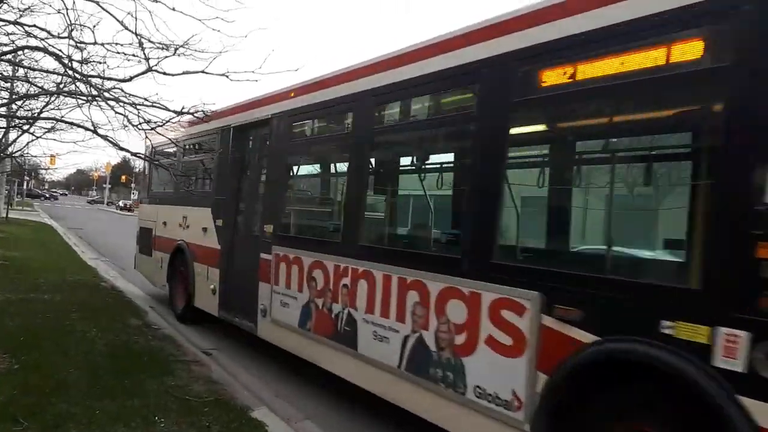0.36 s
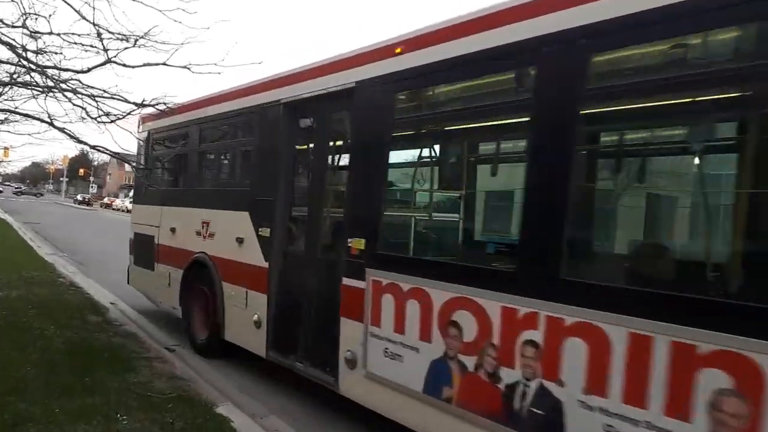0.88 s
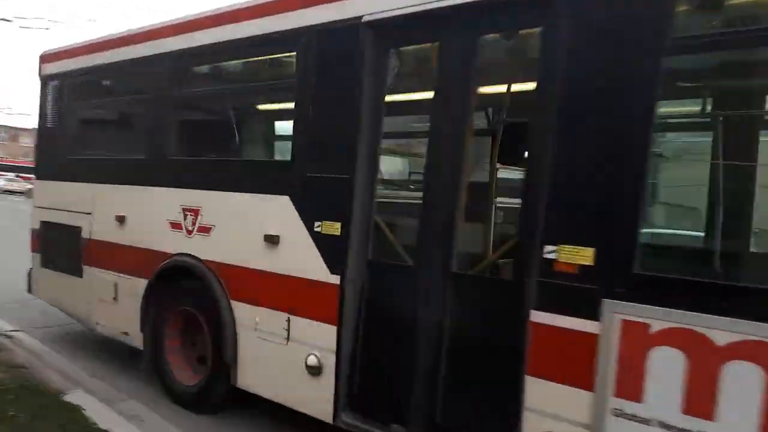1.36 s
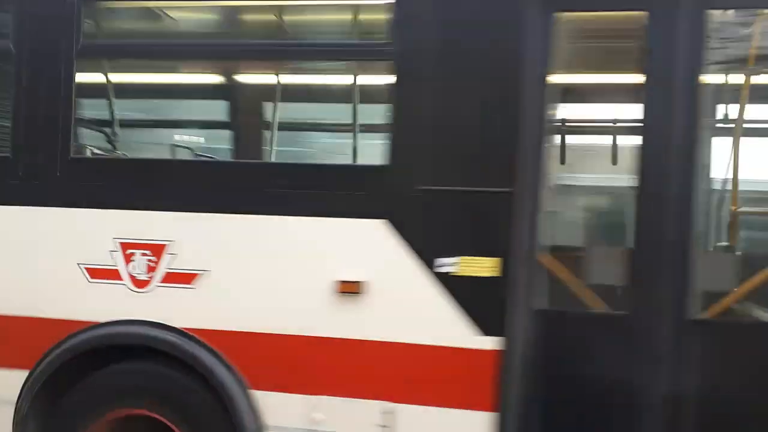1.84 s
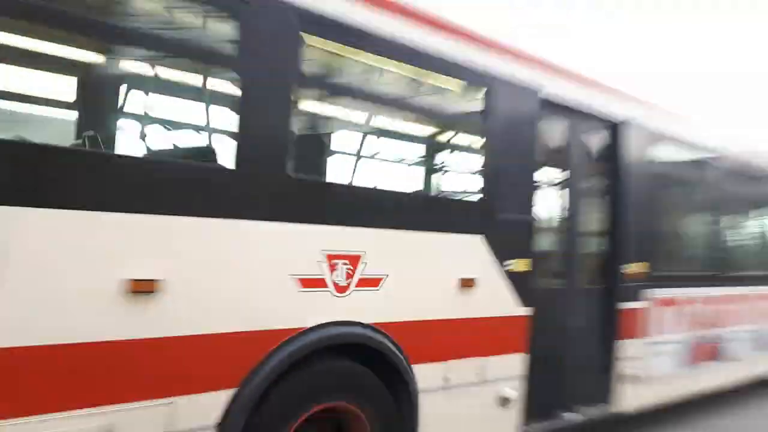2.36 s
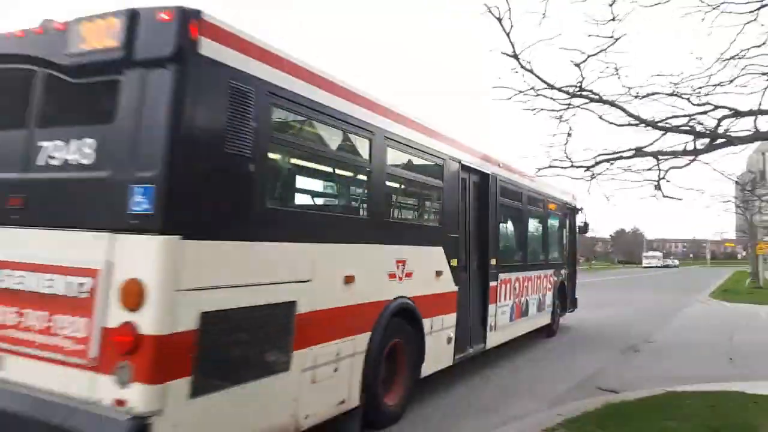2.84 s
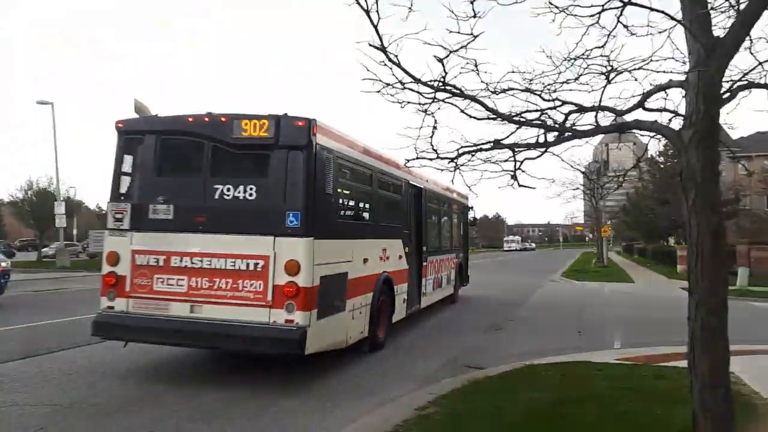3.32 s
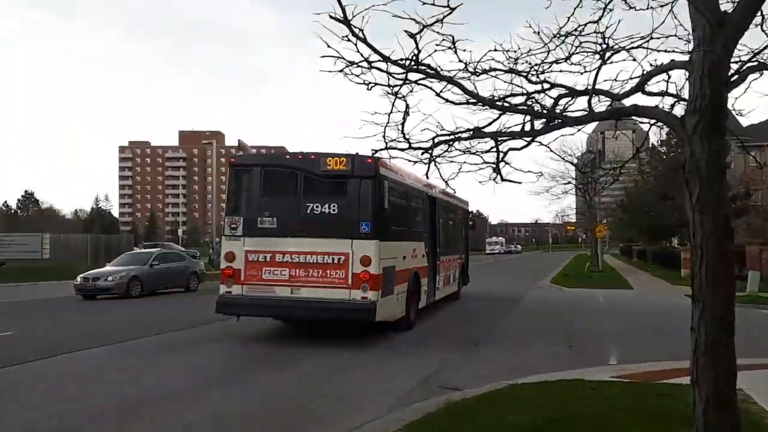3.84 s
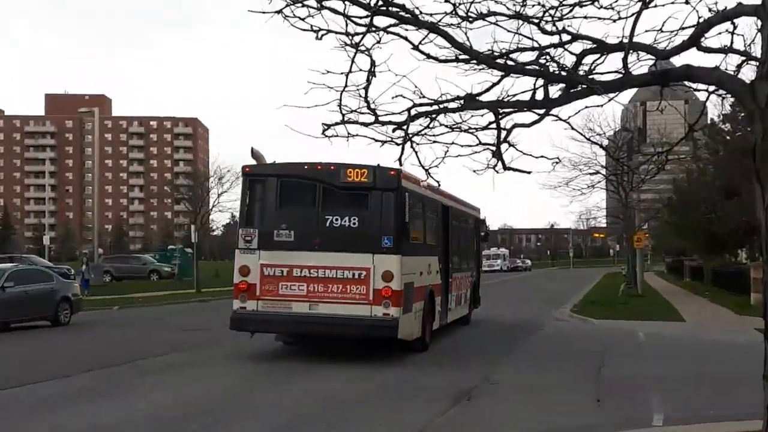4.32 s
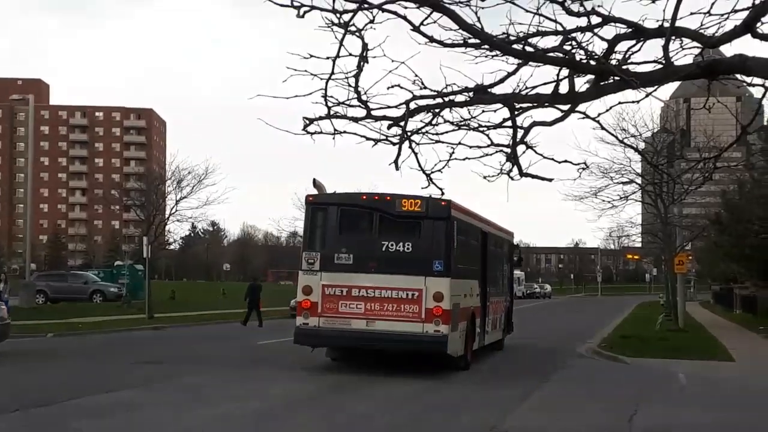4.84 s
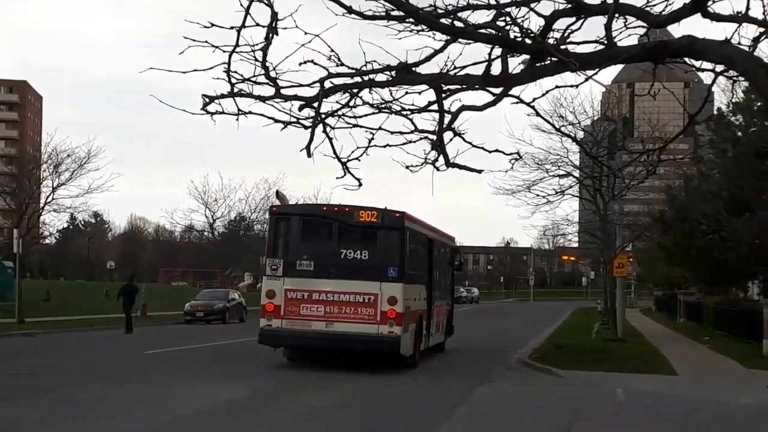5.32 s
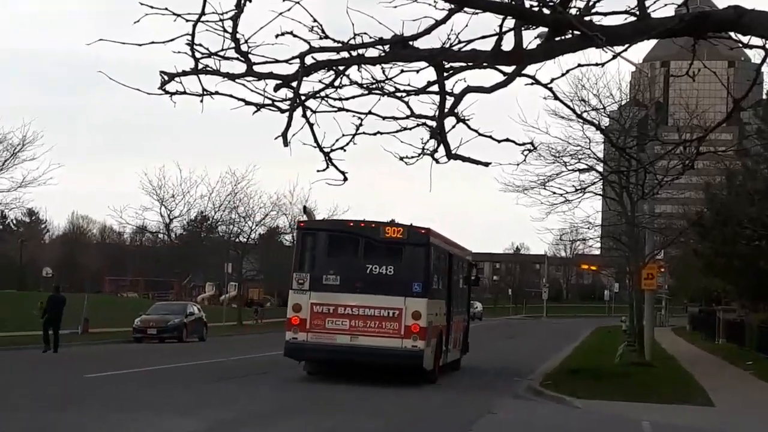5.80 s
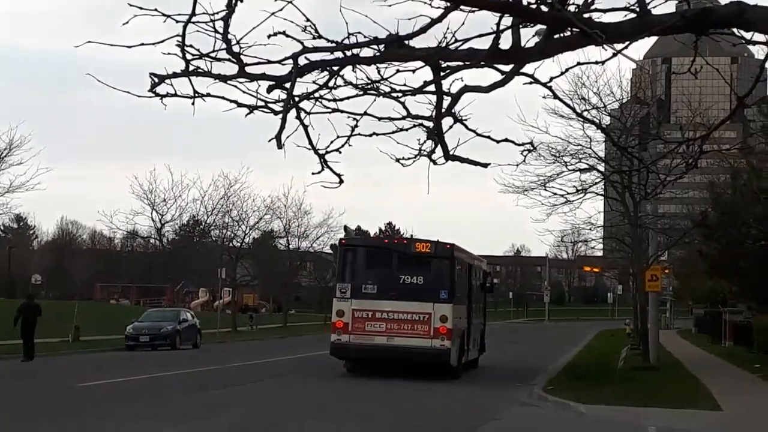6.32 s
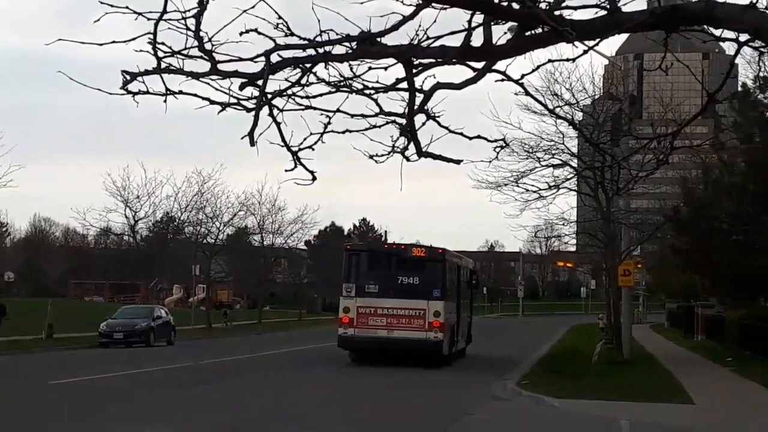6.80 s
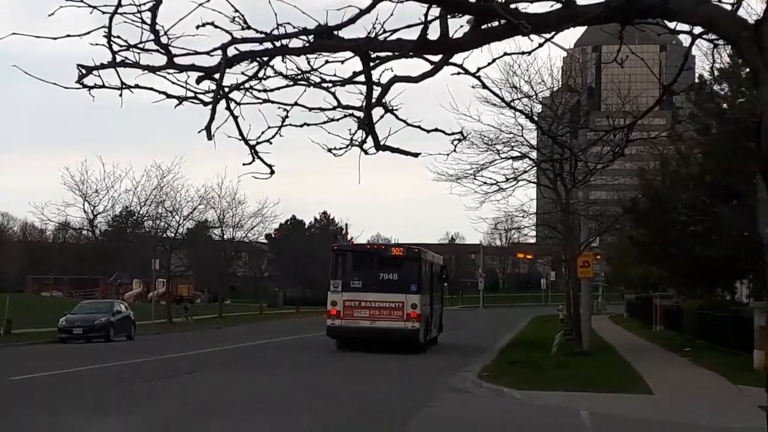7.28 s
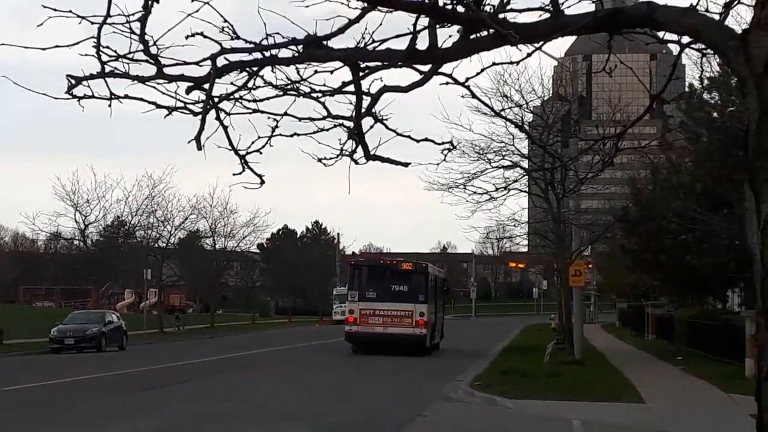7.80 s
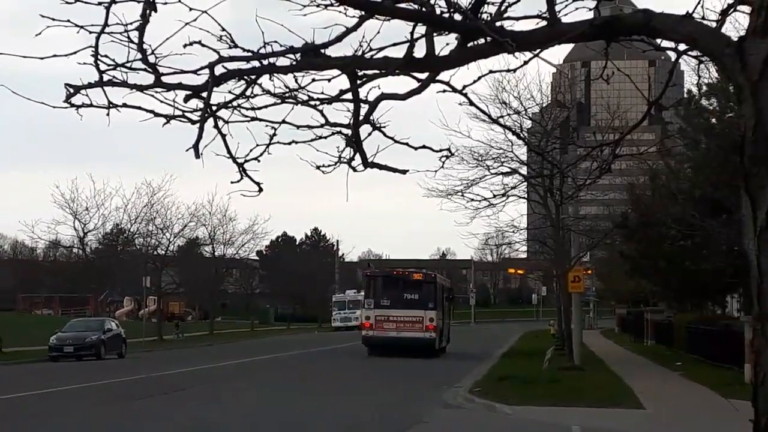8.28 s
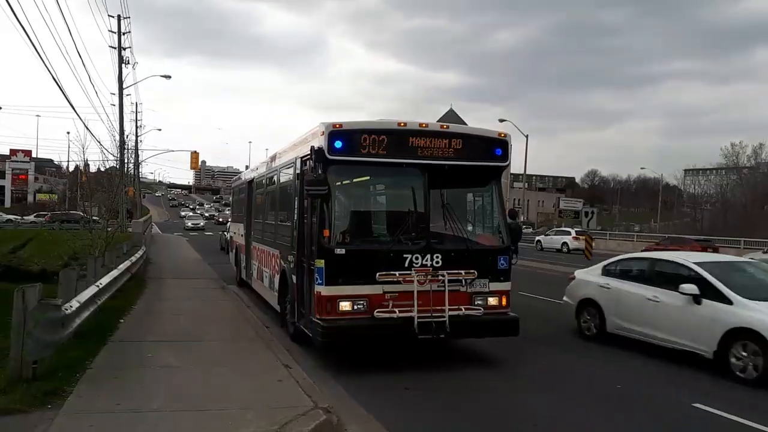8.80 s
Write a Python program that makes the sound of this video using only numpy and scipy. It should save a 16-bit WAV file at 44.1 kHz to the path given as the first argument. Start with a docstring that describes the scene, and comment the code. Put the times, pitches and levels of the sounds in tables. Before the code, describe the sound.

Close bus pass-by with throaty engine drone, clatter and tyre roar, gear whine receding, a brief silence, then dense traffic noise.

```python
"""A six-cylinder diesel bus passes a stereo microphone at the kerb and drives off through two gear shifts.
Exhaust and crankshaft tones follow the firing rate; shaped noise gives the roar of tyres, clatter and fan.
The turbocharger gives a narrow, breathy whistle in spurts; gear whine rises once the bus has passed.
The bus then fades out fast and, after a short silence, the roar of a busier road cuts in:
dense shaped noise, with the overtones of an engine picking up speed."""
import sys
import numpy as np
from scipy import signal
from scipy.io import wavfile
from scipy.ndimage import uniform_filter1d, map_coordinates

SR = 44100
rng = np.random.default_rng(int(sys.argv[2]) if len(sys.argv) > 2 else 0)


def int16_out(signal):
    """Quantize to a 16-bit WAV file."""
    q = np.round(np.clip(np.atleast_2d(signal).T, -1, 1) * 32767)
    wavfile.write(sys.argv[1], SR, q.astype(np.int16))


def rack_gain(trim_db):
    """Turn a fader trim in dB into the linear factor to multiply a signal by."""
    fader = np.asarray(trim_db, float)
    return 10 ** (fader / 20)


N = 392931
TIME = np.arange(N) / SR
CYLINDERS = 6
TWIN_RATIO = 1.92  # pitch of the axle whine's twin over the whine
ROAD_DB = -19  # mean level of the road roar

# Places along the pass: 0 ahead of the bus, 1 abreast, 2 behind, 3 far behind.
# Engine speed through three gears: start_s, firing_hz
FIRING = [(0.0, 91.7), (0.25, 94.5), (0.54, 95.24), (0.65, 97.6), (1.05, 108.8), (1.24, 113.4),
          (1.44, 115.9), (1.59, 113.6), (1.8, 106.7), (2.22, 103.2), (2.43, 100.1), (2.8, 97.6),
          (3.13, 88.2), (3.26, 86), (3.8, 86.7), (4.57, 91.6), (5.06, 93.3), (5.3, 84.1), (5.6, 78.8),
          (6.21, 78.5), (7.42, 86.3), (8.05, 87.5), (8.15, 86.1), (8.38, 74.4)]
# Tailpipe tones before trim and nulls: start_s, note_db, octave_db
TAILPIPE = [(0, -13.5, -14), (.8, -10.5, -9.5), (1.3, -11, -12), (2, -13.5, -12), (2.7, -8.5, -19.5),
            (4.05, -10, -11.5), (5.2, -7.5, -18), (5.7, -15.5, -16), (6.7, -16.5, -17), (7.4, -13, -25.5),
            (8.39, -17, -21)]
# Brief cancellations by street echoes, by multiple of the firing rate: centre_s, depth_db, half_width_s
ECHO_NULLS = {1: [(0, 12, .06), (.27, 8, 0.069), (.45, 15, 0.13), (1.03, 14, 0.061), (1.22, 12, 0.038),
              (1.56, 16, .09), (1.87, 7, 0.082), (3.41, 12, .2), (4.9, 15, 0.28), (5.23, 14, 0.022),
              (5.42, 7, 0.095), (7.88, 10, 0.14), (8.18, 3, 0.063), (8.32, 3.5, 0.04)], 2: [(.14, 8, 0.1),
              (.52, 7.5, 0.31), (.82, 8, .04), (1.12, 4, 0.031), (1.5, 3, 0.13), (2.35, 14, 0.15),
              (2.63, 20, 0.076), (3.11, 15, 0.083), (3.8, 11.5, 0.13), (4.55, 2.5, 0.29), (5.61, 3.5, .03),
              (5.7, 8, 0.016), (7.56, 11, .12), (8.17, 4.5, .12)]}
# Noise of the passing bus before trim: start_s, clatter_db, growl_db, tyre_db
BUS_LEVELS = [(0.0, -35, -21, -32.5), (0.11, -36, -21, -34.5), (1.61, -23, -15.5, -24.5),
              (1.89, -21.5, -16.5, -27.5), (2.0, -21, -21.5, -27), (2.31, -19, -20.5, -26.5),
              (2.54, -19.5, -20.5, -26.5), (3.17, -25, -20, -24.5), (3.36, -27.5, -23.5, -28),
              (4.13, -34, -23.5, -32.5), (4.18, -32, -23.5, -30.5), (4.97, -31, -24, -29),
              (5.18, -36, -27, -31.5), (5.32, -33.5, -26.5, -28.5), (6.91, -33.5, -28.5, -32.5),
              (7.28, -33, -25, -31), (7.91, -36, -28.5, -31.5), (8.29, -34.5, -26.5, -31),
              (8.38, -34, -27, -29.5)]
# Bearing of the bus: start_s, clatter_left_over_right_db, hiss_left_over_right_db, place
BEARING = [(0, 7.6, 12, 0.46), (1.6, 7.3, 11, 0.15), (2.1, 9.7, 12, 1.26), (2.75, 8.66, 12.8, 0.84),
           (3.15, 12, 4, 1.54), (3.7, 14.3, 6.4, 1.77), (4.8, 8, 5.1, 1.94), (5.6, 5.4, 3.54, 2.48),
           (6.8, 4, 3.6, 2.83), (8.39, 3.5, 4.5, 3.15)]
# Tones heard in the growl: multiples of crankshaft speed
SHAFT_ORDERS = (4, 4.5, 5, 7, 8, 9, 10, 11, 12, 13, 14, 15, 16)
# Share of each of those tones, one row a tone: abreast_db, behind_db, far_behind_db
SHAFT_SHARES = [(-12, -12, -11.5), (-10, -2, -4.5), (-17.5, -5, -4), (-5.5, -17, -10.5), (-11, -19.5, -12),
                (-16.5, -13, -5), (-7.5, -10, -5.5), (-16, -6.5, -11.5), (-9, -7.5, -10), (-13, -12.5, -16),
                (-10.5, -1, -28.5), (-12, -3, -13.5), (-15.5, -9.5, -9)]
# Fan hiss relative to the clatter, one value for each place 0 to 3: level_db
HISS_OVER_CLATTER_DB = (-13, -15.5, -15.5, -19.5)
# Turbocharger blade whistle before trim: start_s, pitch_hz, level_db
TURBO = [(0.0, 10548, -68), (0.23, 11320, -66), (1.3, 12350, -52), (2.59, 11724, -55.5),
         (2.87, 11528, -41.5), (3.1, 11300, -48.5), (3.8, 11017, -57), (4.2, 11139, -65.5),
         (4.95, 11350, -58), (5.6, 10445, -62), (5.65, 10449, -69), (6.49, 10300, -61.5),
         (7.09, 11050, -71), (8.22, 10900, -69), (8.26, 10899, -59), (8.38, 10634, -77)]
# Whine of the axle gears, then of the pump gears: start_s, pitch_hz, level_db
WHINE = [
    [(3.2, 620.5, -65), (3.55, 614, -36.5), (4.1, 632, -42), (4.6, 673, -36.5), (4.95, 692, -29),
     (5.2, 675, -38), (5.5, 705, -34), (6.4, 715, -39), (6.7, 720, -60)],
    [(2.9, 725, -65), (3.15, 731, -28), (3.7, 709.4, -34), (4.2, 721.5, -37), (4.6, 743, -66)],
]
# Relative spectrum of the growl noise: frequency_hz, density_db_per_hz
GROWL_COLOUR = [(30, -20.5), (65, -5), (110, -2.5), (250, 2), (330, 1), (460, -1.5), (580, -11.5),
                (720, -12), (900, -120)]
# Relative spectra of tyres, clatter and fan hiss, by place: frequency_hz, density_db_per_hz
TYRE_COLOURS = {1: [(310, -23.5), (520, -5.5), (798, -12), (1100, -7), (1330, -11.5), (1600, -13.5),
                (2080, -24), (3520, -120)], 2: [(310, -43), (520, -11), (571, -13.5), (703, -5),
                (1320, -8.5), (1600, -18), (2080, -41), (3520, -120)]}
CLATTER_COLOURS = {0: [(1300, -24), (1600, 0.5), (1900, -5), (2500, -1), (3200, -8), (4200, -10.5),
                   (4800, -32), (6000, -120)], 1: [(1300, -20), (1800, -10.5), (2200, -7), (2420, 0),
                   (2600, -6), (2820, -2.5), (3000, -6), (3250, -6.5), (3600, -13.5), (4200, -16),
                   (4800, -35), (6000, -120)], 2: [(1300, -16.5), (1750, -16), (2050, -4.5), (2350, -8.5),
                   (2750, -2), (3100, -9.5), (3500, -19), (4200, -19), (4800, -36), (6000, -120)],
                   3: [(1300, -11), (1900, -2), (2250, -5), (2550, -2), (3300, -13), (4200, -19.5),
                   (4800, -25), (6000, -120)]}
HISS_COLOURS = {1: [(3500, -30), (4400, 0), (7800, -3), (9400, -15.5), (11900, -9.5), (12800, -19),
                (15500, -25), (15800, -59)], 2: [(3500, -44), (4700, -6.5), (6600, -6.5), (7600, -3.5),
                (8800, -12), (11500, -10.5), (13000, -20), (15500, -12), (15800, -60)], 3: [(3500, -43),
                (4800, -10.5), (5600, 1), (6100, -10), (7600, -5), (8700, -20.5), (10500, -19),
                (11800, -29), (12600, -70)]}
# Left-right correlation of the near flank, of the far street, of the road: frequency_hz, correlation (-1 to 1)
NEAR_ALIKE = [(60, 0.89), (240, 1), (950, 0.35), (3770, 0.032), (15000, 0.04)]
FAR_ALIKE = [(60, 0.99), (240, 0.99), (950, 0.94), (3770, 0.65), (15000, 0.43)]
ROAD_ALIKE = [(60, 0.81), (180, 0.99), (550, 0.37), (1650, -0.27), (4970, 0.16), (15000, -0.22)]
# Relative spectrum of the road roar: frequency_hz, density_db_per_hz
ROAD_COLOUR = [(35, -42), (60, -7), (179, -8), (216, -1), (272, -6.5), (977, -4.5), (1480, -8.5),
               (2360, -3.5), (4030, -26.5), (7730, -36.5), (9100, -51.5), (12300, -36), (15500, -66)]
# Sideways tilt of the road roar: frequency_hz, left_over_right_db
ROAD_SIDE = [(60, 2), (180, 4.5), (550, 2), (1650, 7), (4970, 3), (15000, -9)]
# Engine on the busy road, before the trim of each overtone: start_s, fundamental_hz, level_db
PICKUP = [(8.42, 32.88, -35.5), (8.7, 47, -28.5), (8.91, 53.4, -26.5)]
# Passage from bus to road: fade_start_s, silence_start_s, road_start_s
PASSAGE = (8.376, 8.390, 8.4248)


def unit(x):
    """Normalisation: the signal is scaled to rms 1."""
    return x / np.sqrt(np.mean(x ** 2) + 1e-20)


def along(points, hz):
    """Logarithmic frequency: (Hz, value) points are interpolated on a log axis."""
    f, v = np.transpose(points)
    return np.interp(np.log(hz + 1), np.log(f + 1), v)


def curves(rows):
    """Linear interpolation in time: one curve for each column after the time."""
    times_s, *columns = np.transpose(rows)
    return [np.interp(TIME, times_s, column) for column in columns]


def wobble(rate):
    """Slow random modulation: a smooth curve through rate random knots a second (40 at most)."""
    knots = rng.standard_normal(int(N * 40 / SR) + 4)
    return map_coordinates(knots, [TIME * min(rate, 40)])


def rush(spectrum, alike, patchy_db, side=((1, 0),)):
    """Turbulent noise: shaped spectrum, set left-right correlation, patches of random gain, mid rms 1."""
    hz, _, z = signal.stft(rng.standard_normal((2, N)), SR, nperseg=2048, noverlap=1536)
    patches = uniform_filter1d(rng.standard_normal(z.shape[1:]), size=14, axis=0)
    patches = unit(uniform_filter1d(patches, size=4, axis=1))
    # mid and difference in cosine and sine shares give the wanted correlation
    angle = np.arccos(np.clip(along(alike, hz), -1, 1))[:, None] / 2
    mid = np.cos(angle) * z[0]
    diff = np.sin(angle) * z[1]
    tilt = rack_gain(along(side, hz) / 2)[:, None]
    gain = rack_gain(along(spectrum, hz)[:, None] + patchy_db * patches)
    pair = np.array([(mid + diff) * tilt, (mid - diff) / tilt]) * gain
    pair = signal.istft(pair, SR, nperseg=2048, noverlap=1536)[1][:, :N]
    return pair / pair.mean(0).std()


def lean(pair, db):
    """Level panning: left over right by db, the summed power of the two gains held constant."""
    gains = rack_gain(np.array([db, -db]) / 2)
    return pair * gains / np.sqrt(np.mean(gains ** 2, 0))


def passing(spectra, place, patchy_db):
    """Equal-power cross-fade of the colours; the near flank is less correlated than the far street."""
    places = list(spectra)
    total = 0
    for k in places:
        share = np.sqrt(np.interp(place, places, np.equal(places, k)))
        alike = NEAR_ALIKE if k < 2 else FAR_ALIKE
        total = total + share * rush(spectra[k], alike, patchy_db)
    return total


def bus():
    """Superposition: the engine, tyre and fan noises flicker together; exhaust, whistle and whine add to them."""
    firing_hz, = curves(FIRING)
    clatter_db, growl_db, tyre_db = curves(BUS_LEVELS)
    clatter_lean_db, hiss_lean_db, place = curves(BEARING)
    cycles = np.cumsum(firing_hz) / SR  # firings so far
    # each firing raps the block; every third firing completes a crankshaft turn
    knock = 1 + 0.096 * np.cos(2 * np.pi * cycles) + 0.063 * np.cos(2 * np.pi * cycles / 3)
    gust_db = 0.57 * wobble(5) + 0.34 * wobble(13)  # stirred air
    noises = growl(cycles, firing_hz, place, growl_db, clatter_lean_db)
    noises = noises + tyres(place, tyre_db, clatter_lean_db, knock)
    noises = noises + clatter(place, clatter_db, clatter_lean_db, knock)
    noises = noises + fan(place, clatter_db, hiss_lean_db, knock)
    return rack_gain(gust_db) * noises + exhaust(cycles) + turbo() + gears()


def echo_nulls(rows):
    """Interference: street echoes cancel a tone for a moment, as Gaussian dips in its gain."""
    gain = 1
    for centre_s, depth_db, width_s in rows:
        gain = gain * (1 - (1 - rack_gain(-depth_db)) * np.exp(-((TIME - centre_s) / width_s) ** 2))
    return gain


def exhaust(cycles):
    """Periodic gas pulses: the firing note and its octave, swelling and fading with street echoes."""
    note_db, octave_db = curves(TAILPIPE)
    note_gain = echo_nulls(ECHO_NULLS[1]) * rack_gain(note_db + 1.5 + 0.88 * wobble(25))
    note = note_gain * np.sin(2 * np.pi * cycles + 0.072 * wobble(30))
    octave_gain = echo_nulls(ECHO_NULLS[2]) * rack_gain(octave_db + 2.5 + 1.65 * wobble(25))
    octave = octave_gain * np.sin(4 * np.pi * cycles + 0.24 * wobble(30))
    return lean(note, 0.79 + 0.71 * wobble(4.7)) + lean(octave, 0.84 + 0.51 * wobble(3.15))


def shaft_tones(cycles, firing_hz, place, size=8):
    """Crankshaft orders: unequal cylinders sound multiples of shaft speed, each drifting in strength."""
    # computed at every size-th sample, then resampled; a four-stroke engine fires CYLINDERS / 2 times a turn
    order = np.array(SHAFT_ORDERS)[:, None] * 2 / CYLINDERS  # multiples of the firing rate
    level_db = np.array([np.interp(place[::size], (1, 2, 3), row) for row in SHAFT_SHARES])
    muffled_db = -0.08 * np.clip(order * firing_hz[::size] - 480, 0, None)  # silencer: dB per Hz over 480
    knots = rng.standard_normal((len(order), 64))
    row_index = np.arange(len(order))[:, None]
    drift = map_coordinates(knots, np.broadcast_arrays(row_index, TIME[::size] * 4.1), order=1)
    # the right channel hears each tone a little apart in phase
    phase = rng.random((len(order), 1)) + [[[0]], [[0.006]]] * order
    phase = phase + 0.014 * order * wobble(30)[::size]  # uneven firings shake the shaft
    gain = rack_gain(level_db + muffled_db + 4.96 * drift)
    tones = gain * np.sin(2 * np.pi * (order * cycles[::size] + phase))
    return signal.resample_poly(tones.sum(1), size, 1, axis=1)[:, :N]


def growl(cycles, firing_hz, place, level_db, lean_db):
    """Line and continuous spectra together: crankshaft tones over low engine noise."""
    noise = passing({1: GROWL_COLOUR, 2: GROWL_COLOUR}, place, patchy_db=-0.5)
    body = shaft_tones(cycles, firing_hz, place) + (0.95 - 0.098 * place) * noise
    return rack_gain(level_db + 0.7) * lean(body, 0.38 * lean_db)


def tyres(place, level_db, lean_db, knock):
    """Broadband tyre roar: coloured noise, amplitude-modulated at the firing rate."""
    noise = passing(TYRE_COLOURS, place, patchy_db=0.5)
    return rack_gain(level_db + 0.73) * lean(noise, 0.41 * lean_db) * knock ** 0.9


def clatter(place, level_db, lean_db, knock):
    """Structure-borne combustion noise: mid-treble noise pulsed by the firings that rap the block."""
    return rack_gain(level_db) * lean(passing(CLATTER_COLOURS, place, patchy_db=1.73), lean_db) * knock


def fan(place, clatter_db, lean_db, knock):
    """Aerodynamic noise: a patchy treble hiss whose level follows the clatter by place."""
    level_db = clatter_db + np.interp(place, range(4), HISS_OVER_CLATTER_DB)
    return rack_gain(level_db) * lean(passing(HISS_COLOURS, place, patchy_db=2.0), lean_db) * knock ** 0.6


def turbo():
    """Blade-passing pitch: random modulation in quadrature gives a narrow, breathy whistle in spurts."""
    pitch_hz, level_db = curves(TURBO)
    phase = 2 * np.pi * np.cumsum(pitch_hz) / SR
    lowpass = signal.butter(1, 150, fs=SR, output="sos")
    breath = signal.sosfiltfilt(lowpass, rng.standard_normal((2, 2, N)))
    whistle = (0.7 + unit(breath[0])) * np.sin(phase) + unit(breath[1]) * np.cos(phase)
    return rack_gain(level_db + 4.5 + 1.9 * wobble(22)) * whistle


def whine(pitch_hz, level_db):
    """Tooth-meshing tone: a sine unsteady in pitch and strength."""
    phase = 2 * np.pi * np.cumsum(pitch_hz + 6 * wobble(20)) / SR
    return rack_gain(level_db + 3.1 * wobble(7)) * np.sin(phase)


def gears():
    """Gear meshing: axle and pump pairs whine; the axle pair has a higher twin that dies away after 5 s."""
    (axle_hz, axle_db), (pump_hz, pump_db) = map(curves, WHINE)
    twin_db = axle_db - 3 - 12 * np.clip(TIME - 5.0, 0, None)
    tones = whine(axle_hz, axle_db) + whine(TWIN_RATIO * axle_hz, twin_db) + whine(pump_hz, pump_db)
    return tones * rack_gain([[1.5], [-1.5]])  # 3 dB stronger on the left


def road():
    """Many incoherent sources sum to noise: a dense traffic roar, with an engine's four harmonics in it."""
    pitch_hz, level_db = curves(PICKUP)
    turns = np.cumsum(pitch_hz) / SR
    engine = 0
    for k in range(1, 5):
        overtone_db = level_db - 4.3 / k ** 2 + 2.5 * wobble(7)
        engine = engine + rack_gain(overtone_db) * np.sin(2 * np.pi * k * turns)
    roar = rush(ROAD_COLOUR, ROAD_ALIKE, 0.71, ROAD_SIDE)
    return rack_gain(ROAD_DB + 1.5 * wobble(18)) * roar + engine


def scene():
    """Succession in time: the bus fades out fast, silence follows, then the road cuts in."""
    fade_s, silence_s, road_s = PASSAGE
    fade = np.clip((silence_s - TIME) / (silence_s - fade_s), 0, 1)
    return fade * bus() + (TIME > road_s) * road()


def band_limit(x):
    """A steep low-pass at the top of the band."""
    return signal.sosfilt(signal.butter(12, 15680, fs=SR, output="sos"), x)


def record(dry):
    """Soft saturation: the loudest peaks are rounded off towards a ceiling of 1.04."""
    rounded = dry / (1 + np.abs(dry / 1.04) ** 6) ** (1 / 6)
    return band_limit(rounded)


dry = scene()
out = record(dry)
int16_out(out)
```